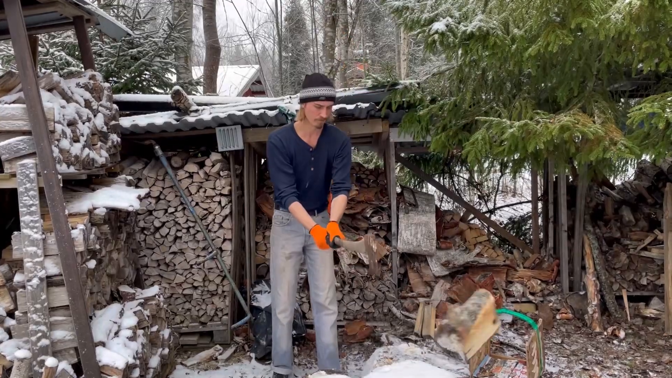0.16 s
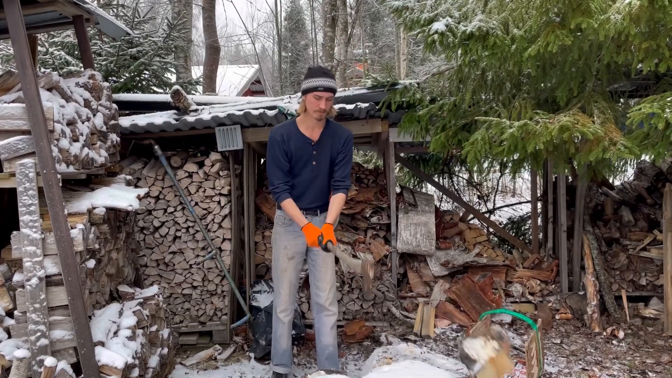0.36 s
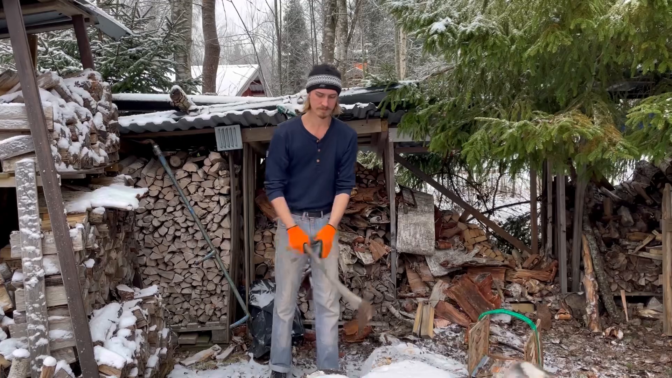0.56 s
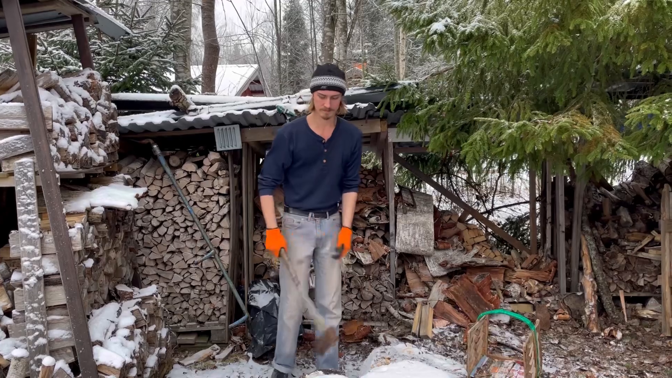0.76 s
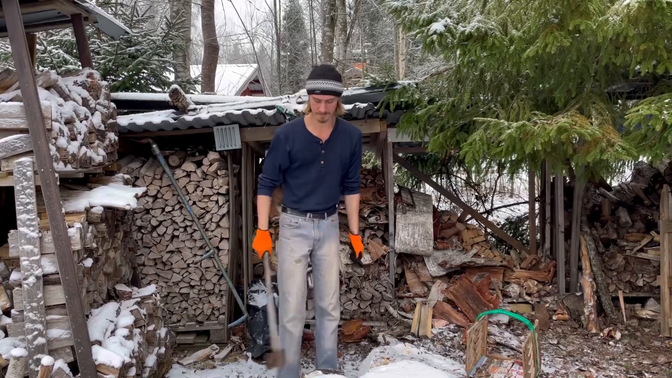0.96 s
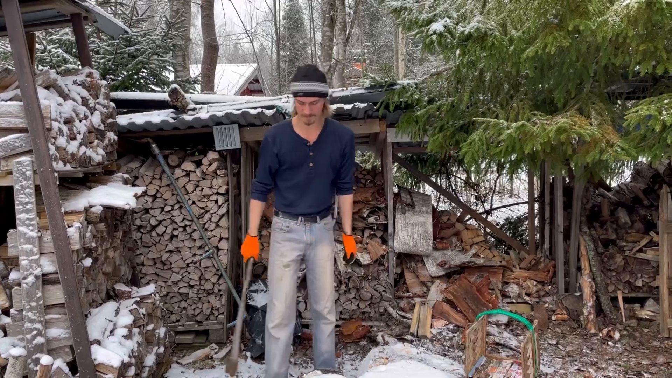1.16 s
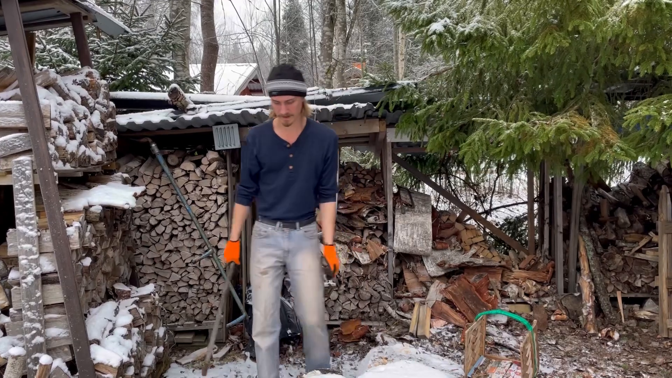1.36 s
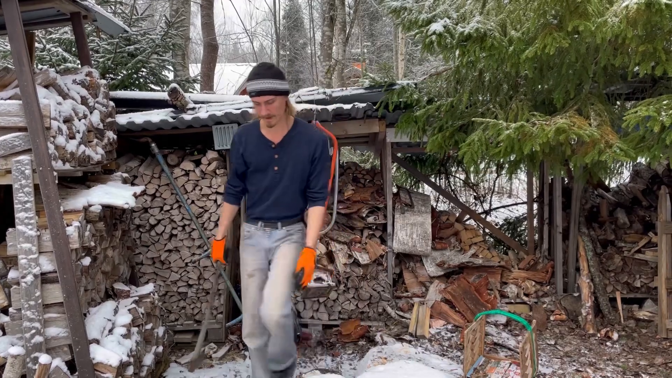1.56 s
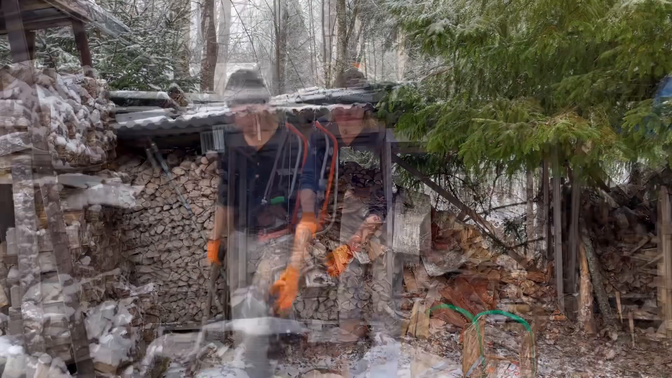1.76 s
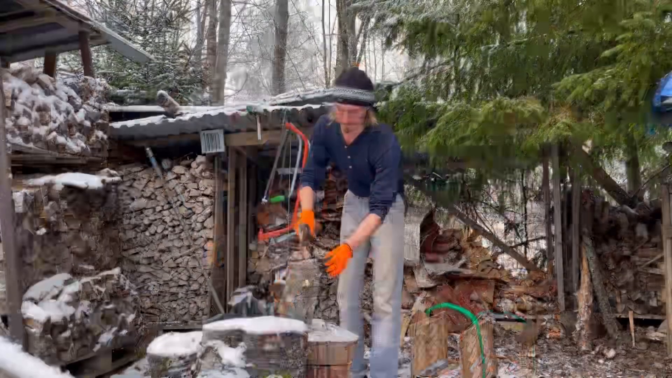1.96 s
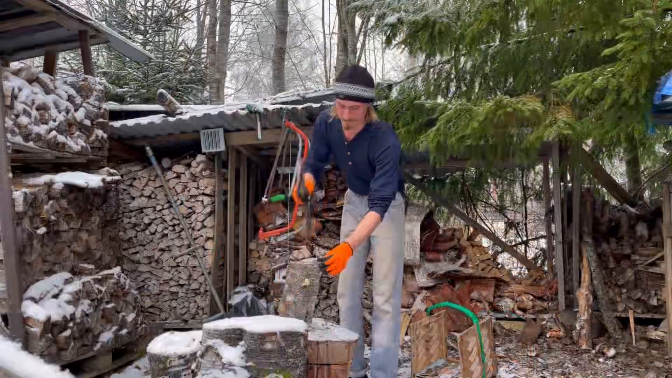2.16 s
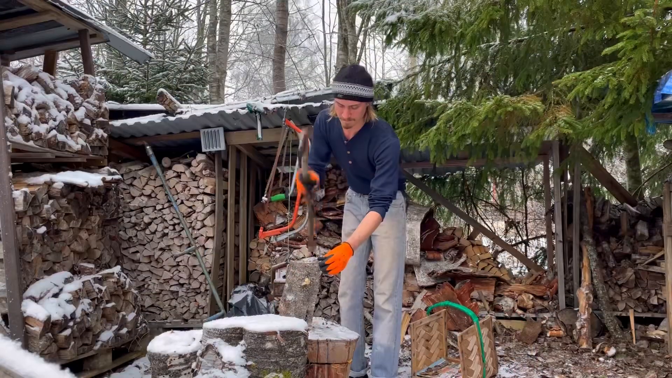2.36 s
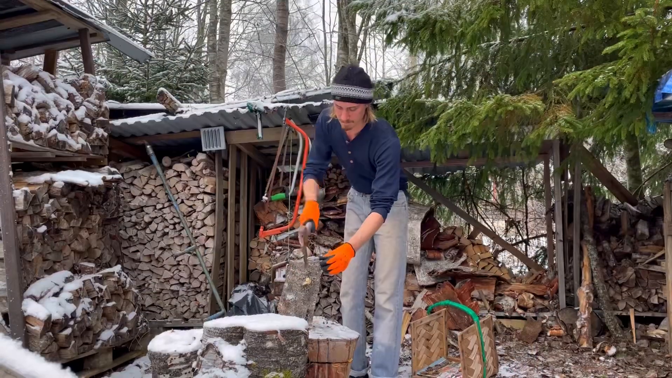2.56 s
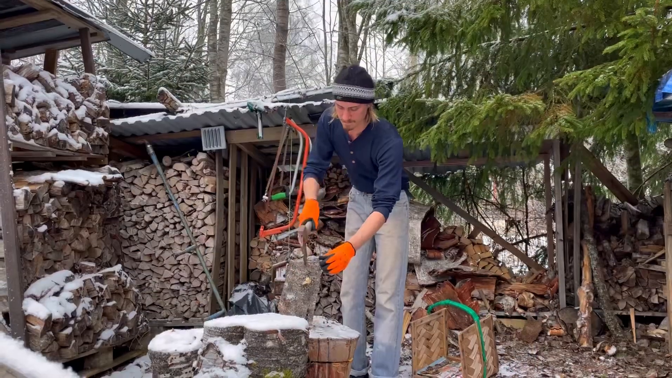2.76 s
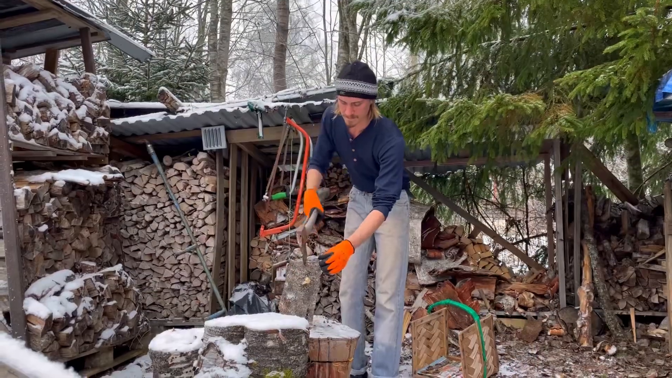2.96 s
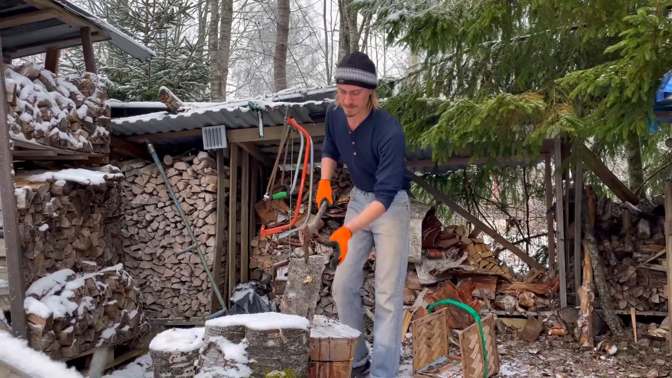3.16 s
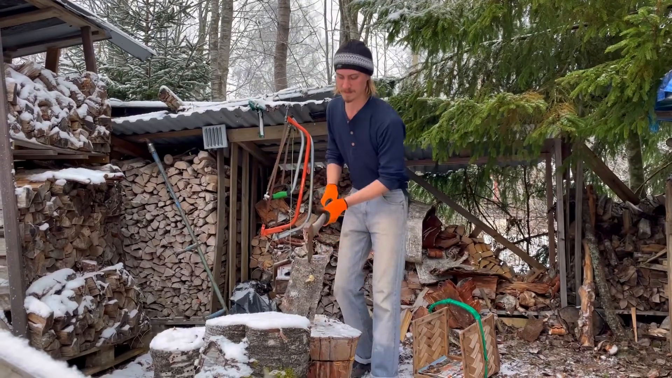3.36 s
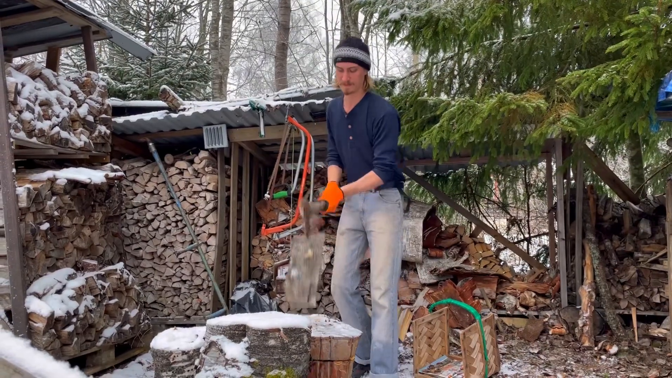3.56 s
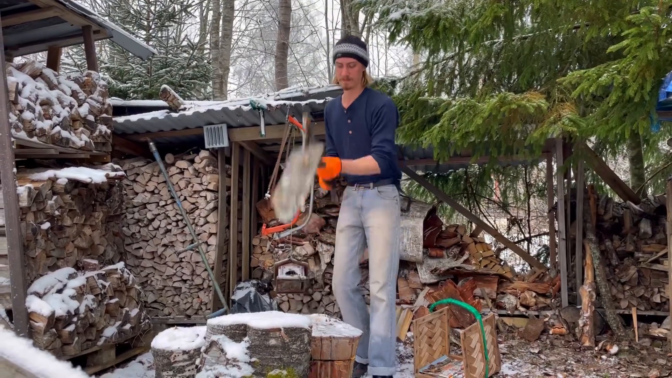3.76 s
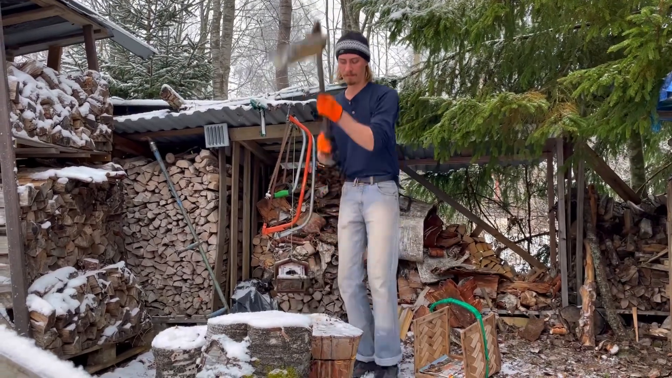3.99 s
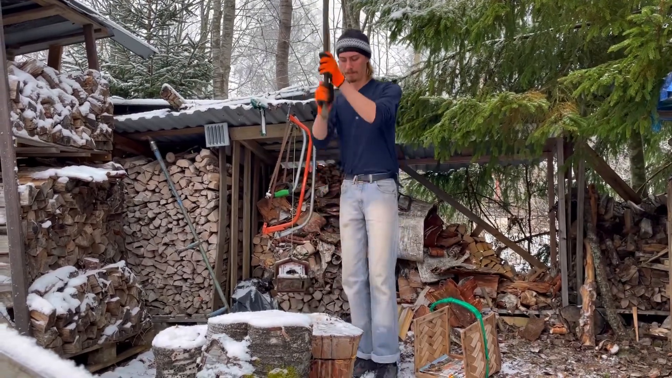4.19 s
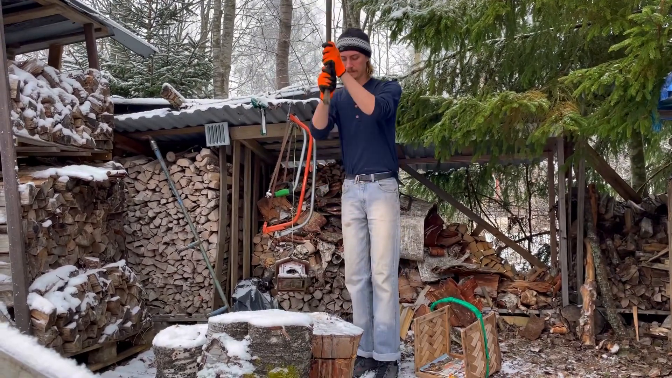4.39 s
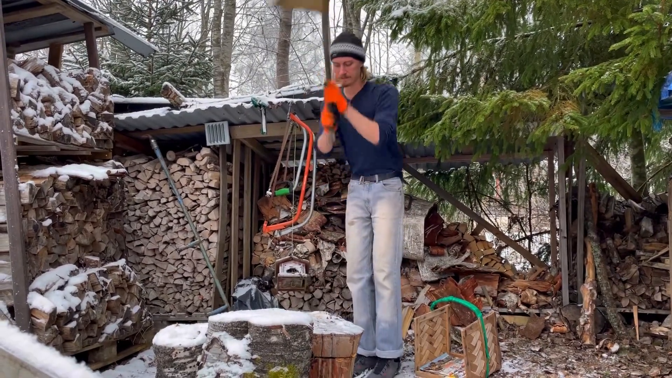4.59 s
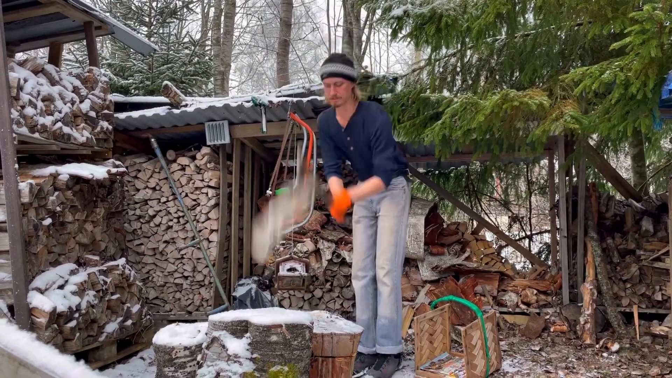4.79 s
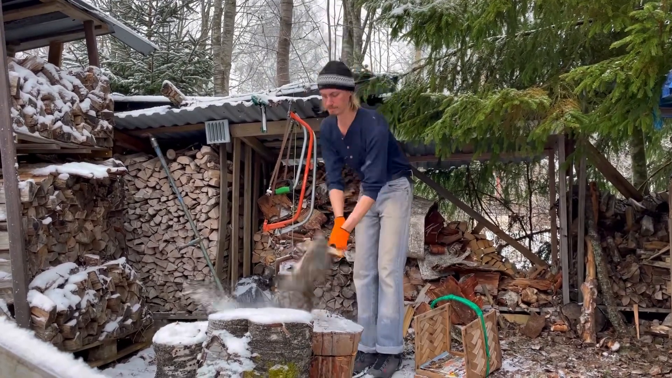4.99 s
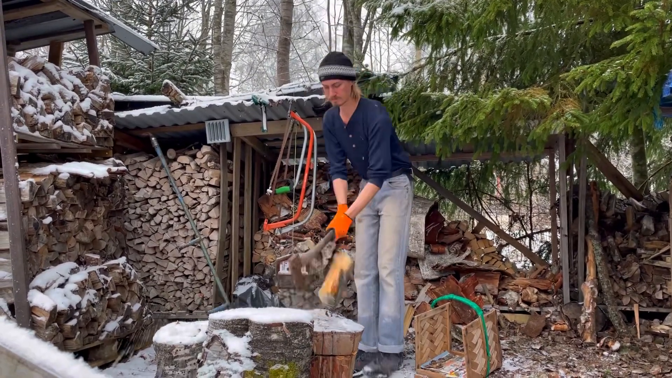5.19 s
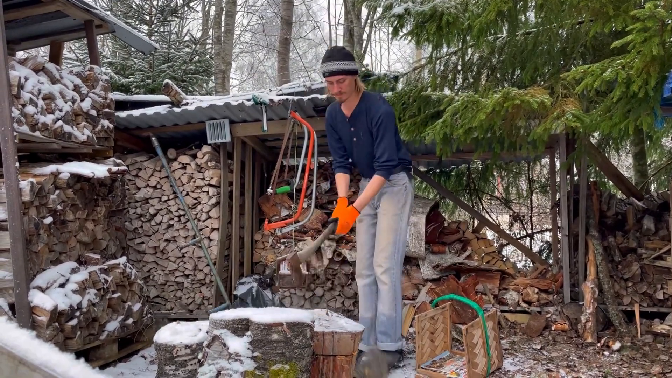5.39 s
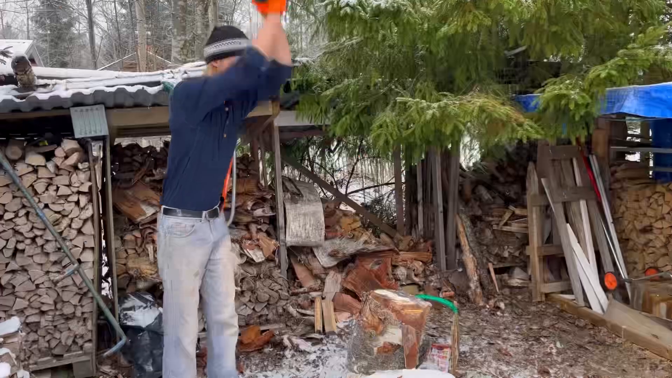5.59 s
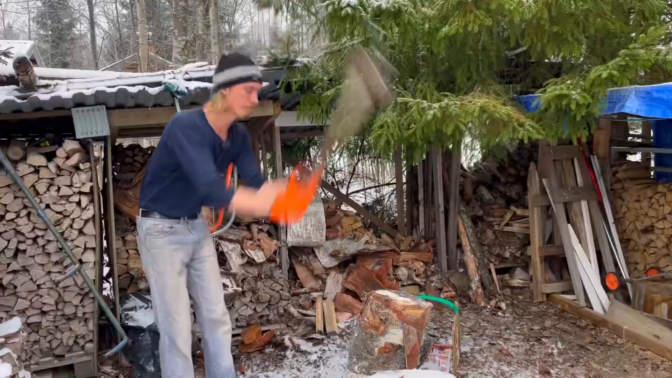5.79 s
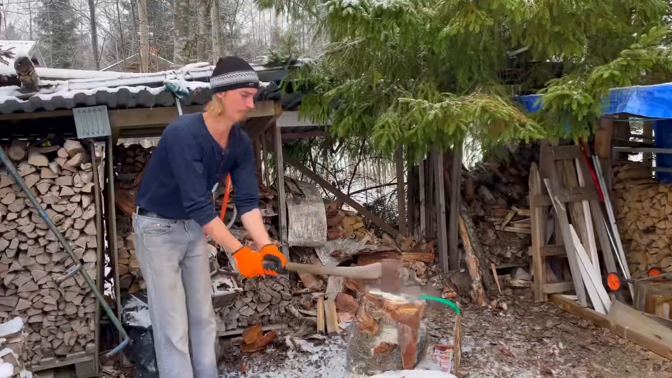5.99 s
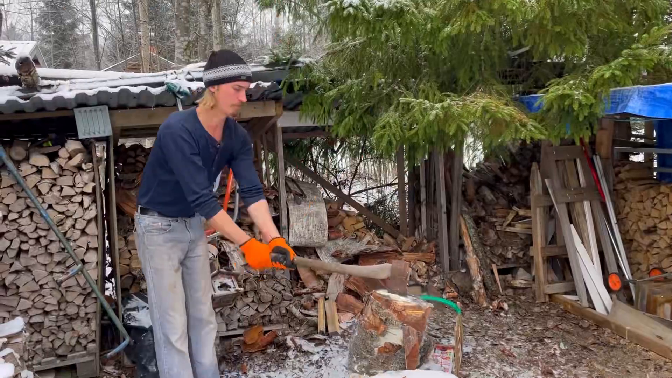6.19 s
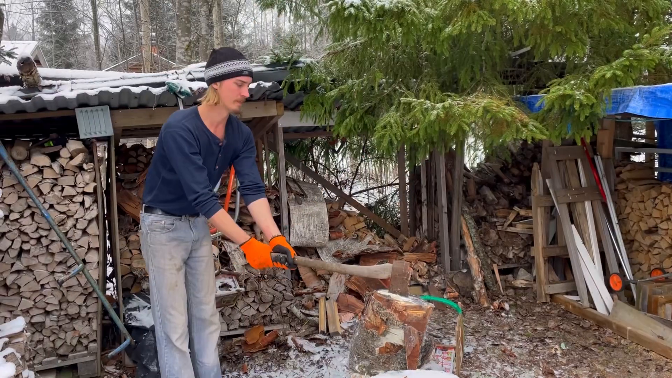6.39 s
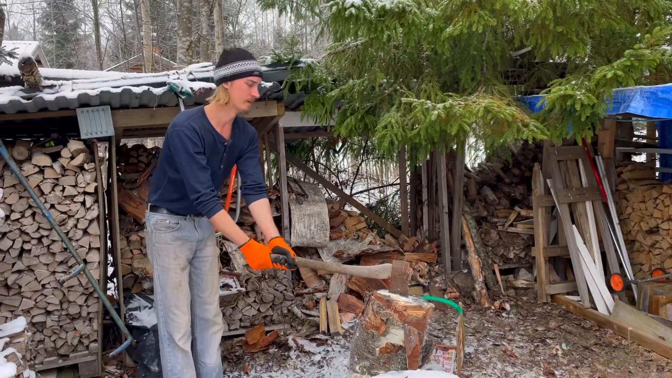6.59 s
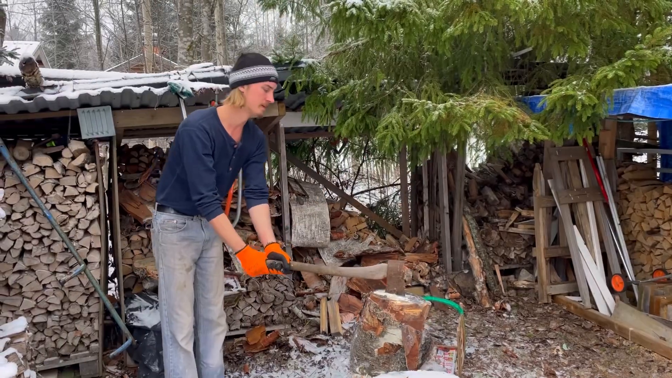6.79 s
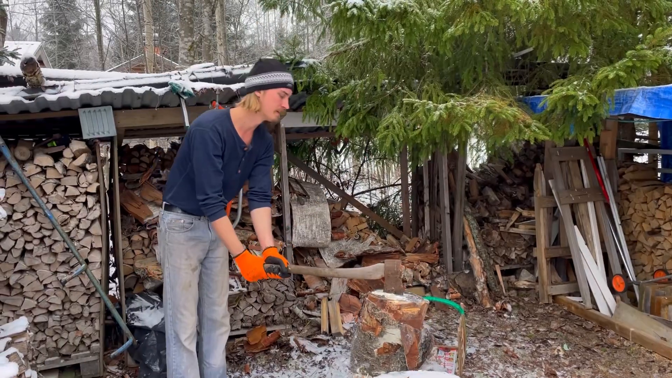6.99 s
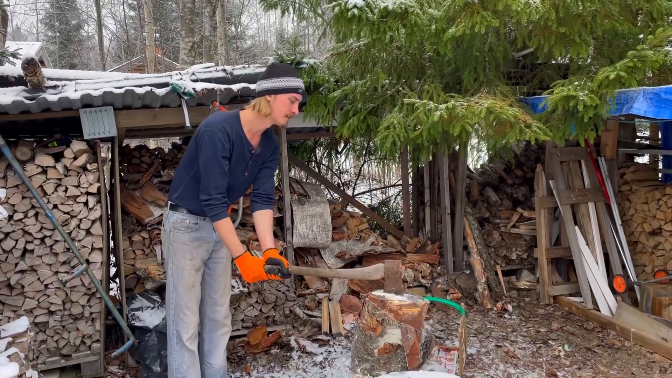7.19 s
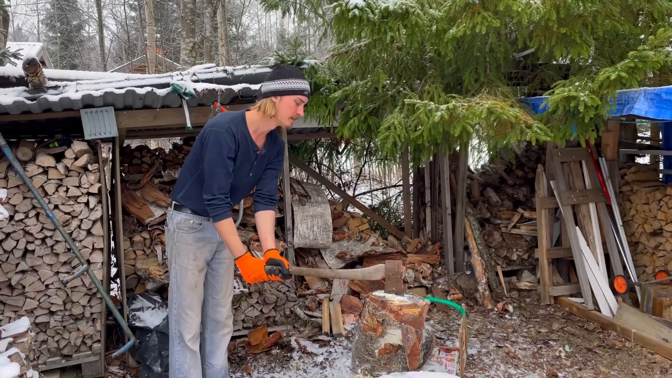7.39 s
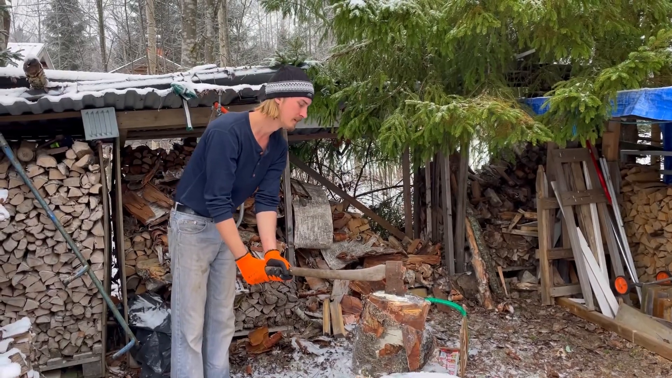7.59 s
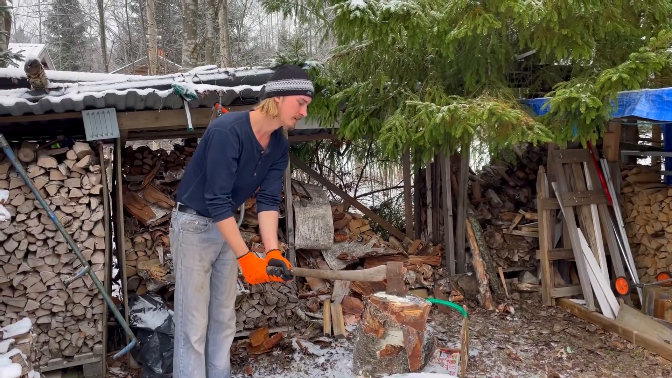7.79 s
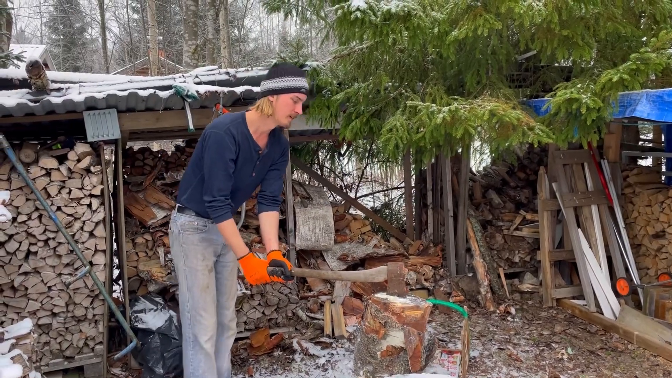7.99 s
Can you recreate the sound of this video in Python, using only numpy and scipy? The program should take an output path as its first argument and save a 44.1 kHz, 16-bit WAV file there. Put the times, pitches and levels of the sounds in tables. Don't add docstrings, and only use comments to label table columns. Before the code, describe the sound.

Split wood thuds and bounces, feet and bark scrape, then two heavy axe blows crack and knock outdoors over frozen ground.

```python
import sys
import numpy as np
from scipy import signal
from scipy.fft import rfft, irfft, next_fast_len
from scipy.io import wavfile
from scipy.ndimage import uniform_filter1d

SR = 44100
rng = np.random.default_rng(int(sys.argv[2]) if len(sys.argv) > 2 else 0)


def to_wav(s):
    ch = np.atleast_2d(s).T
    pcm = np.round(np.clip(ch, -1, 1) * 32767)
    wavfile.write(sys.argv[1], SR, pcm.astype(np.int16))


def to_linear_factor(level_db):
    exponent = np.asarray(level_db, float) / 20
    return 10 ** exponent


N = 355005
CHANGE_S = 5.5128


def colour(x, points):
    hz, db = np.transpose(points)
    grid = np.maximum(np.fft.rfftfreq(4096, 1 / SR), 1)
    gain = to_linear_factor(np.interp(np.log(grid), np.log(hz), db))
    cepstrum = irfft(np.log(gain))
    cepstrum[1:2048] *= 2
    cepstrum[2049:] = 0
    response = irfft(np.exp(rfft(cepstrum)))[:2048]
    return signal.fftconvolve(x, response)[:len(x)]


def band(x, hz, width):
    return signal.lfilter(*signal.iirpeak(hz, hz / width, fs=SR), x)


def level(x, db):
    return x * to_linear_factor(db) / np.sqrt(np.mean(x ** 2))


def peak(x, db):
    return x * to_linear_factor(db) / np.max(np.abs(x))


def add(out, x, s):
    i, change = int(s * SR), int(CHANGE_S * SR)
    end = min(i + len(x), change if i < change else N)
    out[i:end] += x[:end - i]


def walk(rate):
    k = int(SR / rate)
    return uniform_filter1d(np.repeat(rng.standard_normal(N // k + 1), k), k)[:N]


def decay(t, t60):
    return to_linear_factor(-60 * t / t60)


def build(t, rise_s):
    return 1 - np.exp(-t / rise_s)


def soft_build(t, rise_s):
    return 1 - np.exp(-(t / rise_s) ** 2)


def swell():
    since_change = np.arange(N) / SR - CHANGE_S
    return 1 - (since_change > 0) * np.exp(-np.maximum(since_change, 0) / .5)


# (pitch_hz, level_db)
AIR_COLOUR = [(25, -30), (45, -11), (180, -12.5), (400, -12.5), (620, -14), (850, -3.5), (1200, -21.5),
              (2000, -24), (3300, -26), (6500, -33), (10300, -32), (15000, -47.5)]


def air():
    return level(colour(rng.standard_normal(N), AIR_COLOUR), -75.5)


# (pitch_hz, width_hz, level_db)
EXHAUST_RESONANCES = [(830, 190, 13), (720, 120, -8), (1300, 400, -12.5)]


def engine():
    firing_hz = 30.0
    cycles = np.cumsum(firing_hz * (1 + 0.08 * walk(25))) / SR
    size = to_linear_factor(1.8 * rng.standard_normal(N // 500))[cycles.astype(int)]
    puff = size * np.exp(-((cycles % 1 - .5) / 0.085) ** 2) + 0.11
    noise = rng.standard_normal(N) * puff * swell()
    out = np.zeros(N)
    for hz, width, db in EXHAUST_RESONANCES:
        out += to_linear_factor(db) * band(band(noise, hz, 0.8 * width), hz, 0.8 * width)
    return level(out, -71.5)


# (time_s, rustle_db)
MOVEMENT = [(0.0, -60.5), (0.45, -60), (1.1, -62), (1.75, -64), (2.2, -72.5), (2.76, -75), (3.07, -62),
            (3.52, -65.5), (3.79, -69.5), (3.92, -50), (4.05, -69), (4.35, -73), (4.85, -61), (5.4, -58),
            (5.52, -88), (5.87, -65), (6.7, -77.5), (7.4, -96)]
# (pitch_hz, level_db)
RUSTLE_COLOUR = [(200, -40), (350, -14), (800, -4.5), (2200, -5.5), (4200, -4), (7000, -7.5),
                 (11000, -10.5), (16000, -14.5)]


def stir():
    moving = to_linear_factor(np.interp(np.arange(N) / SR, *np.transpose(MOVEMENT)))
    grains = rng.standard_normal(N) * to_linear_factor(3.2 * rng.exponential(size=N))
    patchy = to_linear_factor(2.5 * walk(40) + 2.5 * walk(150))
    rustle = level(colour(grains * patchy, RUSTLE_COLOUR), -1.5) * moving
    low = band(band(rng.standard_normal(N), 63, 50), 56, 160)
    feet_moving = moving ** .37
    feet = level(low, -2.5) * feet_moving * to_linear_factor(-41 + 1.5 * walk(35) + 2.2 * walk(4.5))
    return rustle + feet * swell()


# (start_s, peak_db, t60_s)
SOFT_SCUFFS = [(0.0258, -38.5, 0.088), (0.469, -30, 0.14), (0.7185, -33.5, 0.25), (0.7694, -35.5, 0.098),
               (0.9082, -29.5, 0.11), (0.9887, -28.5, 0.1), (1.2022, -36.5, 0.066), (1.4294, -35, 0.061),
               (1.74, -56, 0.11), (2.3017, -52.5, 0.28), (3.3054, -35, 0.18), (3.3327, -39, 0.35),
               (3.5691, -29.5, 0.1), (3.808, -42, 0.28), (3.986, -34, 0.18), (4.0594, -42.5, 0.146),
               (5.10, -53, 0.084), (5.17, -35, 0.12), (5.26, -39, 0.1), (5.30, -40, 0.09),
               (5.7094, -54, 0.16), (5.85, -33, 0.2), (6.25, -59, 0.18), (6.438, -52, 0.17),
               (6.7874, -52.5, 0.18), (7.74, -63, 0.3), (7.9774, -55.5, 0.27)]
# (start_s, peak_db, t60_s, pitch_hz, resonance_db)
BARK_SCRAPES = [(0.02, -49, 0.3, 505, 19), (0.1496, -33, 0.093, 5100, 0), (0.3809, -52.5, 0.083, 4450, 7),
                (1.1375, -27.5, 0.071, 4850, 5), (1.511, -37, 0.049, 5450, 1), (1.99, -55.5, 0.3, 302, 13),
                (2.36, -48, 0.48, 1200, 14.5), (2.893, -46, 0.28, 2120, 1), (3.0179, -35, 0.13, 2030, 15),
                (3.1096, -40.5, 0.19, 1700, 8.5), (3.333, -31, 0.1, 1900, 18), (3.692, -46, 0.1, 3320, 0.5),
                (3.8949, -49, 0.13, 4400, 3.5), (3.93, -51.5, 0.57, 336, 13), (4.30, -36, 0.12, 1920, 4.5),
                (4.49, -50.5, 0.3, 1900, 8), (4.6498, -59, 0.18, 2196, 19), (5.3492, -47.5, 0.15, 2515, -1),
                (6.3194, -50.5, 0.11, 5204, 0.5), (6.6694, -52.5, 0.12, 4000, 3.5)]


def scuffs():
    out, t = np.zeros(N), np.arange(SR // 3) / SR
    rows = [(*scuff, 2435, -13.5, 0.017) for scuff in SOFT_SCUFFS]
    rows += [(*scrape, .012) for scrape in BARK_SCRAPES]
    for s, db, t60, hz, resonance_db, rise_s in rows:
        grains = rng.standard_normal(len(t)) * to_linear_factor(2.6 * rng.exponential(size=len(t)))
        thin = signal.lfilter(*signal.butter(2, 800, "high", fs=SR), grains)
        whistle = to_linear_factor(resonance_db) * band(grains, hz, hz / 4)
        tone = colour(thin, RUSTLE_COLOUR) + whistle
        add(out, level(tone, db - 7) * soft_build(t, rise_s) * decay(t, t60), s - rise_s / 2)
    return out


# pitch_hz, width_hz, t60_s, level_db
FAR_TREES = (1501.5, 898.5, 1.0, -38.5)


def trees(x):
    hz, width, t60, db = FAR_TREES
    t = np.arange(int(.7 * SR)) / SR
    scattered = band(rng.standard_normal(len(t)), hz, width)
    echo = level(scattered * decay(t, t60) * soft_build(t, .12), db)
    second_take = x * (np.arange(N) >= CHANGE_S * SR)
    return signal.fftconvolve(second_take, echo / np.sqrt(len(t)))[:N]


# (pitch_hz, t60_s, level_db)
YARD_ECHO = [(98, 0.21, -12.5), (296.3, .15, -19.5), (790.4, .22, -12), (1550, .4, -4.5),
             (3360, 0.22, -4.5), (6060, 0.54, -11.5), (12000, 0.75, -15.5)]


def yard(x):
    t = np.arange(int(.7 * SR)) / SR
    echo = np.zeros(len(t))
    for hz, t60, db in YARD_ECHO:
        echo += to_linear_factor(db) * band(rng.standard_normal(len(t)), hz, .6 * hz) * decay(t, t60)
    echo *= build(t, 0.0021) * to_linear_factor(2.1 * walk(130)[:len(t)])
    return signal.fftconvolve(x, echo * to_linear_factor(-25.5) / np.sqrt(np.sum(echo ** 2)))[:N]


# (start_s, peak_db, pitch_hz, length_s)
GROUND_THUDS = [(0.006, -42.5, 71.1, 0.057), (0.335, -22, 61.9, 0.05), (0.281, -8, 93.56, 0.047),
                (0.442, -3.5, 105, 0.031), (0.517, -8.5, 101, 0.04), (0.743, -12, 105, 0.041),
                (0.954, -20.5, 101, 0.051), (1.162, -37, 92.2, 0.04), (1.629, -23, 90.5, 0.045),
                (1.709, -30.5, 75.4, 0.027), (1.803, -29, 160.4, 0.024), (2.403, -49, 113, 0.049),
                (2.511, -9.5, 89.6, 0.044), (3.756, -52.5, 73.2, 0.025), (3.927, -47.5, 70.7, 0.03),
                (4.052, -49, 105, 0.043), (4.286, -44.5, 72.5, 0.034), (4.454, -39.5, 78.1, 0.048),
                (4.698, -55, 72.7, 0.039), (4.859, -11.5, 122, 0.024), (4.886, -13, 93.66, 0.052),
                (4.919, -9, 81.4, 0.019), (5.293, -42.5, 95.56, 0.05), (5.343, -37.5, 62.4, 0.039),
                (5.452, -6.5, 100.5, 0.039), (5.87, -5.5, 99.6, 0.049), (5.961, -34, 72.28, 0.11),
                (6.06, -41, 71.05, 0.059), (6.144, -40.5, 63.4, 0.046)]
# (start_s, knock_peak_db)
SOFT_BUMPS = [
    (1.0622, -48.5),
    (2.2338, -52.5),
    (2.711, -48.5),
    (3.193, -56),
    (4.3884, -46.5),
    (5.6122, -61),
]


def thuds():
    out, t = np.zeros(N), np.arange(SR // 2) / SR
    under_bumps = [(s, db + 8.5, 105, .038) for s, db in SOFT_BUMPS if s < CHANGE_S]
    for s, db, hz, length_s in GROUND_THUDS + under_bumps:
        phase = 2 * np.pi * hz * (t + 2.1 * .0045 * build(t, 0.0031))
        wave = np.sin(phase) * soft_build(t, 0.0035) * np.exp(-(t / length_s) ** 2.2)
        low = band(band(rng.standard_normal(len(t)), 0.57 * hz, 100), 0.57 * hz, 100)
        scatter = level(band(low, 0.65 * hz, 98), -12)
        rumble = scatter * build(t, 0.0025) * decay(t, 0.48)
        add(out, to_linear_factor(db - 4.0) * (wave + rumble), s - .003)
    return out


# (pitch_hz, level_db)
CRACK_COLOUR = [(600, -11), (1300, 1.5), (2000, -2), (2600, -0.5), (3400, 0), (4300, -2.5), (5500, -4),
                (7000, -9.5), (11000, -13), (16000, -22)]


def crack(t):
    noise, splinter = rng.standard_normal((2, len(t)))
    t60 = .019
    tearing = build(t, 0.00023) * (decay(t, t60) + to_linear_factor(-13) * decay(t, 7.5 * t60))
    clicks = to_linear_factor(15 * uniform_filter1d(splinter, size=40))
    return colour(noise * tearing * clicks, CRACK_COLOUR)


# (pitch_hz, level_db, t60_s)
LOG_TONES = [(189, -7.5, .05), (254, -7.5, 0.16), (341, 2, 0.051), (447.5, -1.5, 0.075), (529, -2, 0.049),
             (635, -2.5, .05), (705, -3, 0.048), (756, -5.5, 0.041), (875, -2, 0.04), (1040, -1, 0.022),
             (1230, -2, 0.031), (1295, -1, 0.025), (1626, -7.5, 0.029), (1900, 0.5, 0.014)]


def knock(t, hardness, ringing):
    ring = np.zeros(len(t))
    for hz, db, t60 in LOG_TONES:
        a, b = rng.standard_normal(2)
        lag_s = .002 * (500 / hz)
        late = np.maximum(t - lag_s - 0.00055 * abs(b), 0)
        tilt = 0.44 * np.log2(hz / 500) + 1.4 * max(np.log2(hz / 800), 0)
        size = to_linear_factor(db + hardness * tilt + 1.2 * a) * build(late, 0.51 / hz)
        tone = np.sin(2 * np.pi * hz * (1 + 0.036 * b) * late)
        ring += size * tone * decay(late, ringing * t60)
    return ring


# (start_s, crack_peak_db, knock_peak_db, hardness_db_per_octave)
AXE_BLOWS = [(0.278, -38, -25.5, -14), (0.4345, -23.5, -54.5, 5.5), (0.5078, -31, -70, -3.5),
             (0.7342, -26, -42, 1.5), (0.9418, -27, -39, 0.5), (1.6119, -26.5, -27.5, -4),
             (1.8029, -30, -27, -5), (2.4995, -16.5, -17.5, -7.5), (4.8569, -23, -16, -8.5),
             (4.8772, -7.5, -3.5, -1.5), (4.8865, -12.5, -38, -3.5), (4.8898, -16.5, -10.5, 3),
             (4.8949, -26.5, -29, -0.5), (5.16, -32.5, -44, 2), (5.4273, -38, -37, -9),
             (5.4368, -23.5, -34.5, -4.5), (5.4441, -20, -24.5, -6.5), (5.8624, -4, -7, -2.5),
             (5.9796, -48.5, -40, -4.5)]
# (start_s, crack_peak_db)
SNAPS = [(0.99, -45.5), (4.261, -53.5), (2.6722, -38), (3.0175, -47), (3.3354, -35.5), (3.4664, -46.5),
         (3.5378, -46), (4.437, -48), (4.7544, -44.5), (5.2, -42), (5.255, -29.5), (5.296, -34.5),
         (5.7, -56.5), (4.8725, -28), (2.875, -59)]


def contacts():
    cracks, knocks, t = np.zeros(N), np.zeros(N), np.arange(SR // 4) / SR
    rows = [(*blow, .8) for blow in AXE_BLOWS]
    rows += [(s, db, db - 22.5, -2.5, .8) for s, db in SNAPS]
    rows += [(s, db - 25.5, db, -8, .45) for s, db in SOFT_BUMPS]
    for s, crack_db, knock_db, hardness, ringing in rows:
        add(cracks, peak(crack(t), crack_db - 0.5), s - .0008)
        add(knocks, peak(knock(t, hardness, ringing), knock_db + 3.0), s - .0008)
    return cracks, knocks


def takes(f, x):
    first = np.clip((CHANGE_S - np.arange(N) / SR) / 0.0024, 0, 1)
    return first * f(x * (first > 0)) + (first == 0) * f(x * (first == 0))


# (pitch_hz, level_db)
PORT_DIFFERENCE = [(60, -24.5), (300, -25), (700, -11.5), (1500, -11), (3000, -12), (6000, -11), (8300, -2),
                   (10000, -3), (11500, -16.5), (14000, -3), (16500, -18.5)]


def difference(x):
    hz, db = np.transpose(PORT_DIFFERENCE)
    size = next_fast_len(N)
    grid = np.fft.rfftfreq(size, 1 / SR) + 1
    gain = to_linear_factor(np.interp(np.log(grid), np.log(hz), db))
    return irfft(rfft(x, size) * gain, size)[:N]


# (pitch_hz, level_db)
PORT_SHARED = [(25, -15.5), (42, -3.5), (70, -3), (7000, -3.5), (7600, -8), (7900, -27.5), (8700, -21),
               (9100, -5), (10000, -1.5), (13500, -2.5), (14500, -24.5), (16000, -26)]


def scene():
    cracks, knocks = contacts()
    ground = thuds()
    hits = cracks + knocks + ground
    airborne = cracks + to_linear_factor(1.5) * knocks + to_linear_factor(-4.0) * ground
    echo = [takes(yard, airborne) + trees(airborne) for _ in range(2)]
    rustle = [scuffs() + stir() + engine() for _ in range(2)]
    hiss = [air() for _ in range(2)]
    lagged = np.imag(signal.hilbert(hits, next_fast_len(N)))[:N]
    mid = takes(lambda x: colour(x, PORT_SHARED), hits + rustle[0] + echo[0] + hiss[0])
    direct = to_linear_factor(1.0) * lagged - to_linear_factor(-16) * cracks
    side = difference(direct + to_linear_factor(2.0) * rustle[1] + to_linear_factor(5.5) * echo[1] + hiss[1])
    return np.array([mid + side, mid - side])


def roll_off(x):
    return signal.sosfilt(signal.butter(12, 15970, fs=SR, output="sos"), x)


def record(dry):
    mix = np.tanh(1.148 * dry) / 0.7
    return roll_off(mix)


dry = scene()
out = record(dry)
to_wav(out)
```